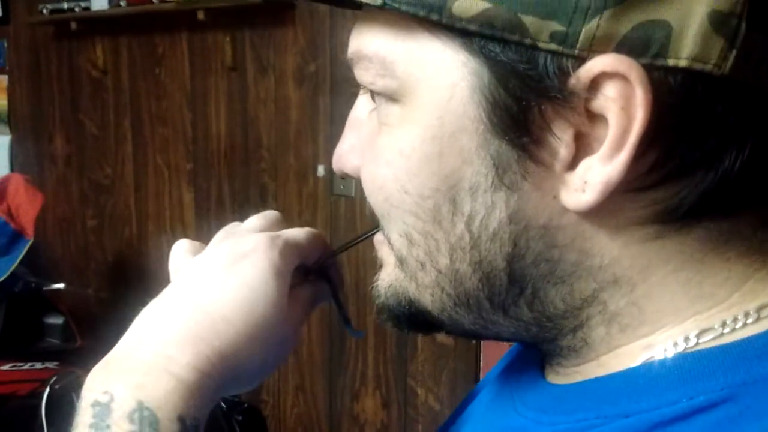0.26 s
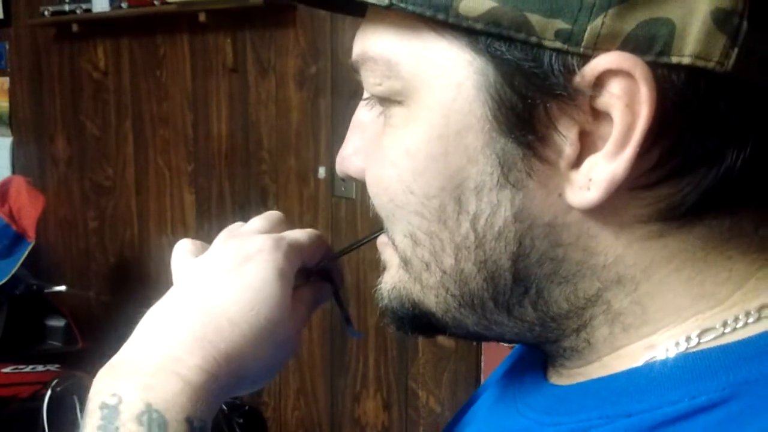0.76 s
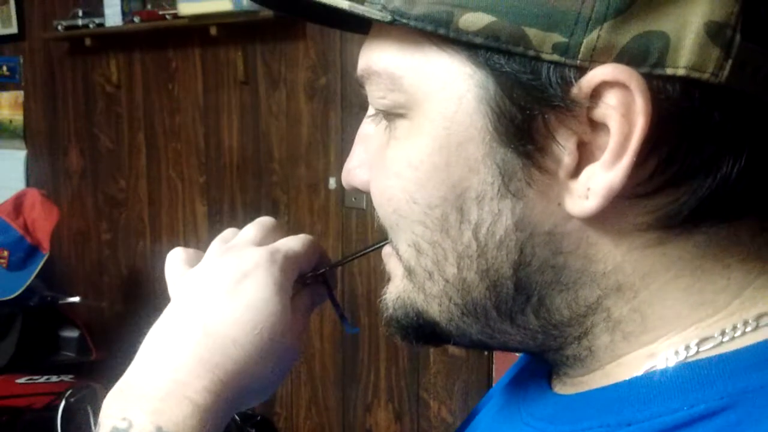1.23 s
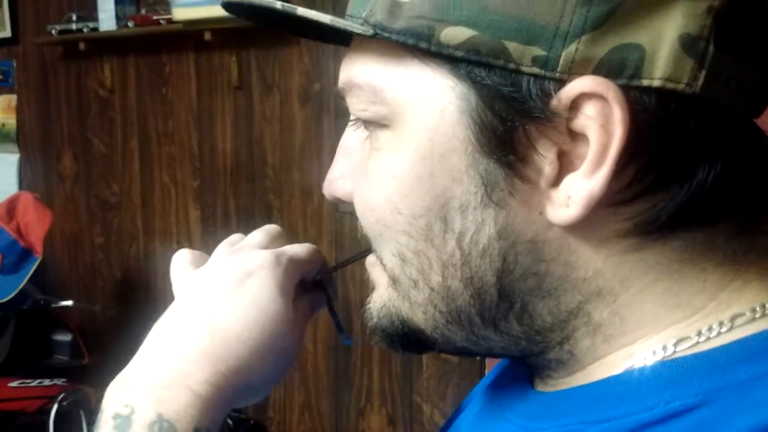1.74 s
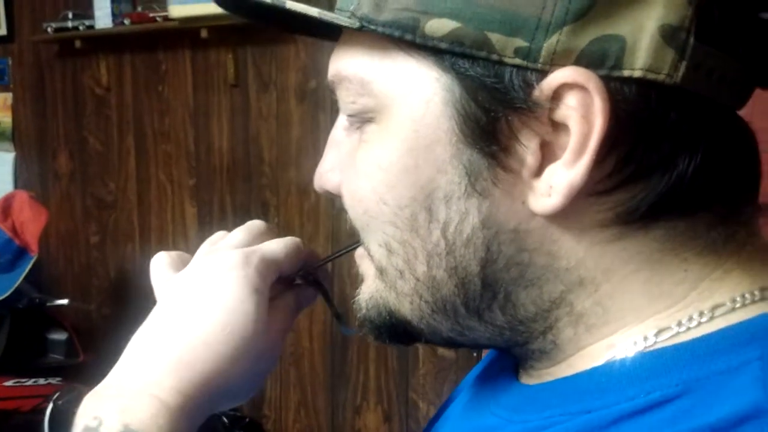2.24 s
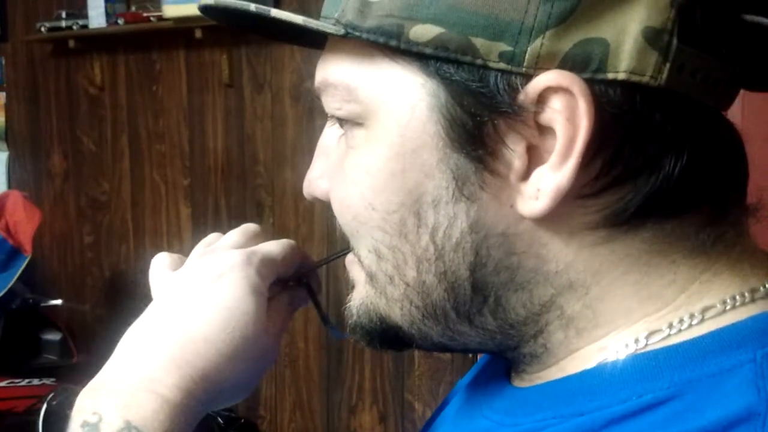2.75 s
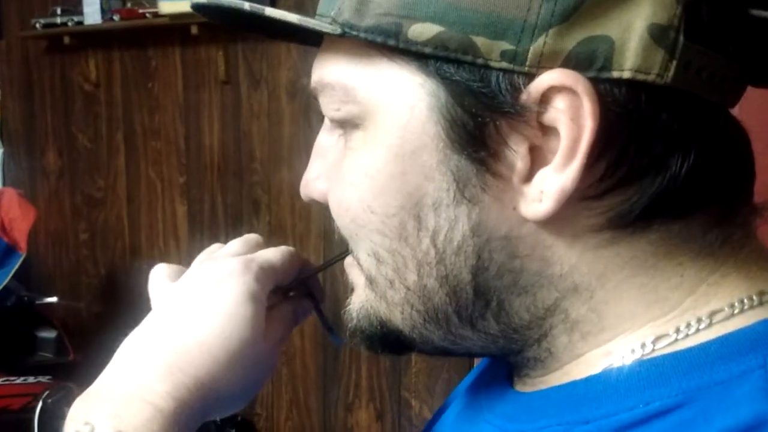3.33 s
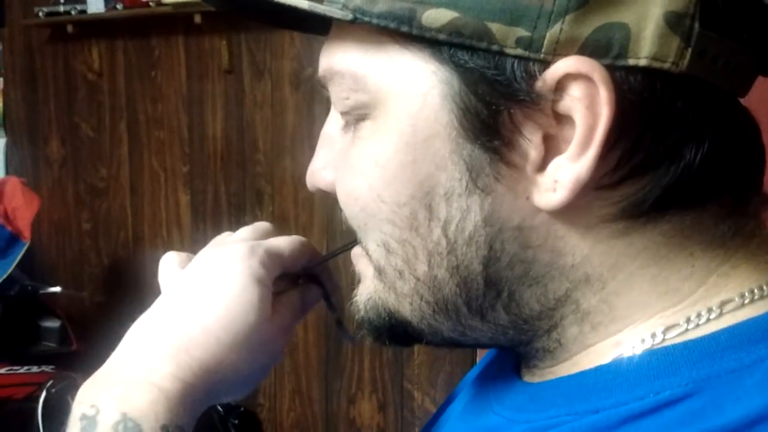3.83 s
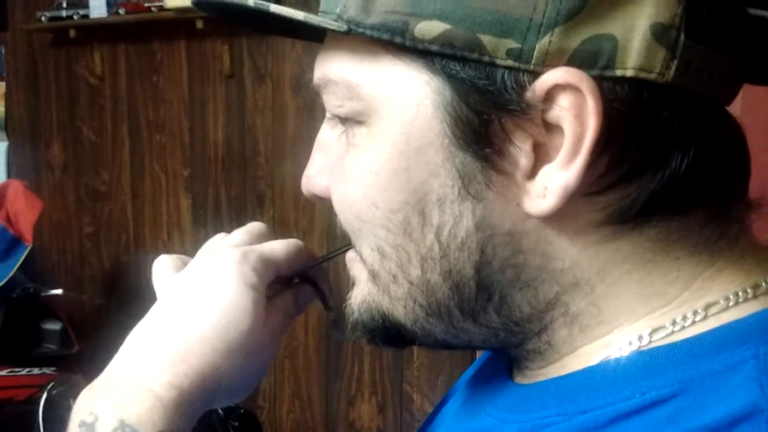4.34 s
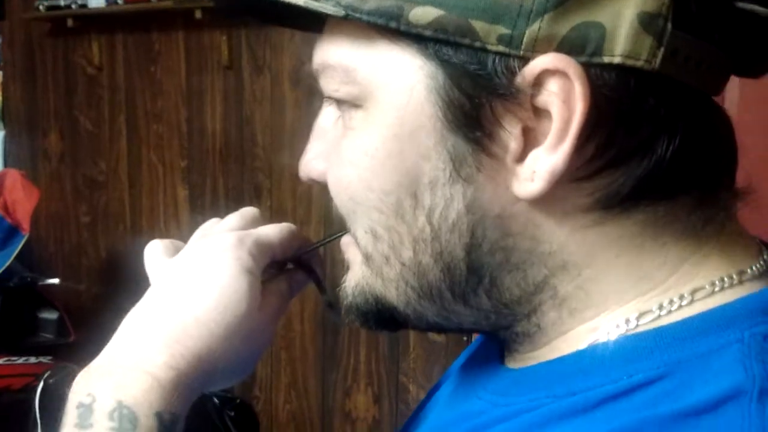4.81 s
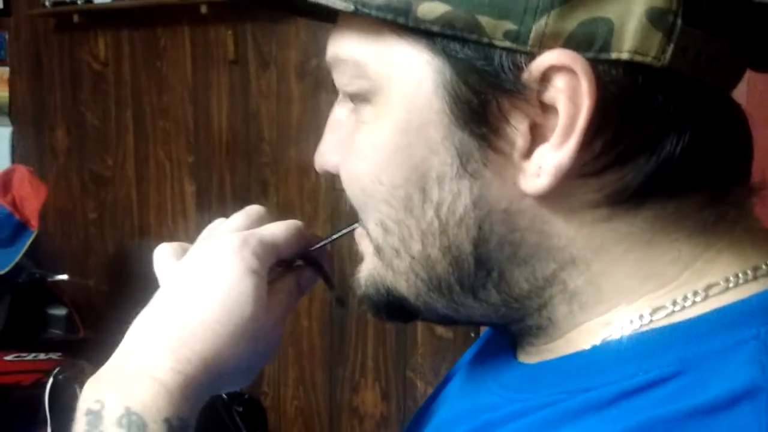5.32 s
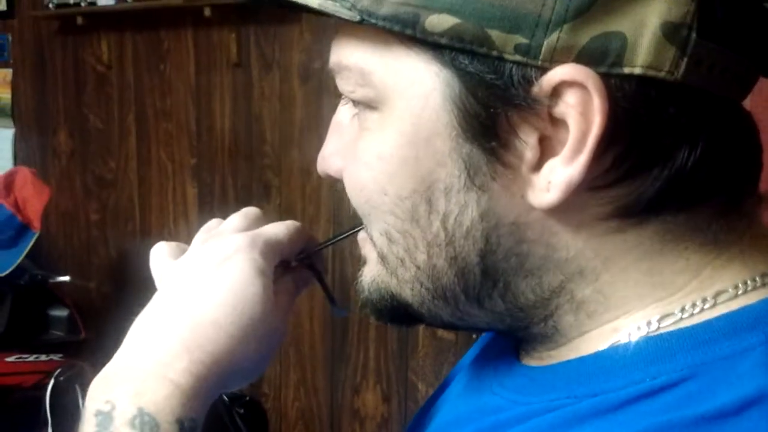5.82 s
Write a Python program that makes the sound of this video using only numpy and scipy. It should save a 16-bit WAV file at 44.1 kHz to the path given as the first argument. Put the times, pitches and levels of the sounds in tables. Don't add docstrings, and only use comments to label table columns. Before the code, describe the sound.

Tiny sharp steel ticks inside a lock held close, irregularly spaced, with brief handling bumps in a quiet small room with low hiss.

```python
import sys
import numpy as np
from scipy import signal
from scipy.fft import rfft, irfft, next_fast_len
from scipy.io import wavfile
from scipy.ndimage import uniform_filter1d

SR = 44100
rng = np.random.default_rng(int(sys.argv[2]) if len(sys.argv) > 2 else 0)


def voltage_ratio(decibels):
    exponent = np.asarray(decibels, float) / 20
    return 10 ** exponent


def to_wav(s):
    ch = np.atleast_2d(s).T
    pcm = np.round(np.clip(ch, -1, 1) * 32767)
    wavfile.write(sys.argv[1], SR, pcm.astype(np.int16))


N = 267731

# (frequency [Hz], level [dB])
AIR_SPECTRUM = [(20, -77), (90, -61), (140, -66.5), (330, -70), (460, -70.5), (1000, -75.5), (2800, -88.5),
                (3800, -89)]
AIR_FALL_DB = -24
# (centre [Hz], width [Hz], gain [dB])
AIR_LUMPS = [(96, 20, 3.5), (120, 7, 3), (143, 20, -2), (394, 20, 8), (459.5, 29, 5), (510, 38, 5.5),
             (585, 73, -2.5), (700, 47, 4), (744, 25, -5), (803, 40, 4.5), (895, 24, 4.5), (950, 40, -2),
             (1028, 63, 6), (1200, 105, 2)]
# (frequency [Hz], level [dB])
PORT_HISS = [(100, -89), (3000, -97.5), (6200, -101), (8000, -95.5), (9500, -95.5), (12000, -99),
             (15500, -100), (15640, -150)]
# (frequency [Hz], gain [dB])
HISS_TILT = [(1000, 0), (7500, 0), (9300, -5), (11500, -5), (13000, 0), (15000, -2)]
# (frequency [Hz], t60 [s])
ROOM_T60 = [(500, 0.25), (2000, 0.58), (5000, 0.22), (8000, 0.24), (13000, 0.21), (14500, 0.072),
            (15500, .03)]
# (frequency [Hz], gain [dB])
WALL_GAIN = [(6000, 1), (9000, -1), (12000, -4)]

# (centre [Hz], width [Hz], level [dB])
SCRATCH_MODES = [(7000, 1200, 0), (8400, 1500, -1)]
SCRATCH_PER_S, SCRATCH_DB = 45, -65
# (time [s], level [dB], centre [Hz], width [Hz], length [ms])
RUBS = [
    (2.44, -57, 1860, 220, 210),
    (3.283, -32, 4700, 3000, 13),
    (3.283, -48, 8400, 1500, 13),
    (3.5, -51.5, 1850, 300, 210),
    (5.415, -44, 3930, 2400, 42),
]
# (time [s], level [dB], centre [Hz], width [Hz], length [ms])
KNOCKS = [(.008, -49, 7000, 1500, 2.5), (.018, -42, 8000, 3000, 5), (.2562, -38, 11000, 8000, .4),
          (.2578, -34, 1490, 1800, 2), (.8805, -32, 1900, 1300, 2.8), (.884, -32, 1180, 240, 8.7),
          (3.153, -37, 5000, 9100, 1.7), (3.284, -30.5, 2050, 2400, 24), (3.286, -32, 895, 600, 34),
          (5.339, -28.5, 804, 700, 4), (5.34, -43, 3000, 2500, 2.7)]
KNOCK_FAR_DB, RUB_FAR_DB = -8.5, 5.5

# (time [s], peak [dB], lock case share [dB], pin share [dB], moving pin pitch [Hz])
CLICKS = [(0.2569, -26.5, -18, -4, 10400), (0.8805, -19.5, -14, -4.5, 13000), (2.051, -43, -5, -7, 12700),
          (2.483, -39, -6, -13, 13200), (3.173, -22.5, -12, -8, 13000), (3.5094, -50.5, -16, -4, 13000),
          (3.7134, -37.5, -4.5, -4, 12900), (4.2728, -37, -5, -7, 15700), (4.633, -38, -19, -13, 14500),
          (4.8497, -46, -16, -8, 12400), (5.445, -39.5, -4.5, -8, 12900), (6.05, -42, -18, -11, 10800)]
RATTLE_MS, RATTLE_MS_PER_DB = 1.95, .018
# (centre [Hz], width [Hz], level [dB])
CASE_MODES = [(3450, 450, -1), (3850, 500, 0), (4530, 500, -7), (5000, 600, -4), (5550, 600, -3)]
# (centre [Hz], width [Hz], level [dB])
BLADE_MODES = [(6700, 660, -1), (7270, 490, 1.5), (8730, 530, 6), (9130, 310, -12)]
# (centre [Hz], width [Hz], level [dB])
PIN_MODES = [(11100, 950, 9), (11600, 550, -8), (13000, 750, 1), (15000, 540, -24), (15100, 600, -24)]
# (time [s], level [dB], centre [Hz], width [Hz], length [ms])
JOLTS = [
    (.8808, -21.5, 4570, 1140, 0.98),
    (.8811, -21, 5450, 1200, 0.82),
    (.8815, -24, 3500, 600, 1.07),
    (3.1733, -28.5, 3980, 900, 2.4),
    (4.2731, -41, 5050, 1500, .3),
]
# (time [s], level [dB], frequency [Hz], rise [ms])
RINGS = [(.2572, -32, 10500, .35), (.2576, -37, 10000, .5), (.2574, -41, 9000, .5),
         (.8806, -25, 3460, 0.81), (.881, -25, 4500, 0.39), (.8811, -23, 5340, .35), (.8808, -25, 6340, .5),
         (.8807, -25.5, 8150, 0.35), (.881, -28.5, 11080, 0.98), (.8819, -26, 11780, .8),
         (.8811, -22.5, 13000, .6), (.8816, -29, 14450, .7), (.8812, -30, 15000, .6),
         (.8832, -28, 5900, .3), (.8831, -30, 10000, .3), (0.81, -35, 3800, .8), (.8808, -40, 1400, 0.48),
         (2.4835, -42, 4050, 0.89), (2.4835, -48, 13400, .7), (2.484, -52, 14700, .6),
         (3.174, -21.5, 13000, 0.57), (3.1734, -30, 5600, .4), (3.1745, -31, 6200, .4),
         (3.1733, -27, 7450, 0.41), (3.174, -34, 8600, .6), (3.1736, -30, 10900, .4),
         (3.1745, -33, 11600, 0.52), (3.1797, -40, 10900, 2.2), (4.273, -35, 4900, 0.38),
         (4.2728, -41, 8160, 0.31), (4.2735, -40.5, 3750, 0.7), (4.273, -38, 12900, .4),
         (4.2725, -36, 15700, .6)]

PORTS_APART_M = .116
# (frequency [Hz], gain [dB])
CROSS_GAIN = [(1600, -2.9), (3200, -7), (6400, -4.6), (8000, -7.5), (9500, -13), (11500, -15), (12700, -13),
              (13900, -7.3)]
CROSS_DELAY_MS, PORT_HZ, PORT_DELAY_MS = .311, 8050, .117
# (frequency [Hz], share [ratio])
LOCK_SIDE = [(3400, 1.1), (4600, 1.0), (5500, 0), (6700, .5), (8000, 1.1), (12300, 1.2), (13300, -.6),
             (14300, -.95)]
# (frequency [Hz], gain [dB])
RIGHT_GAIN = [(400, -2.3), (1000, -5.2), (1250, -1.8), (4000, -2.2), (6500, -.3), (9500, 1.6), (11500, .3),
              (13000, -2.5)]
# (frequency [Hz], gain [dB])
TOP_EDGE = [(15400, 0), (15900, -4), (16500, -20), (16850, -55)]


def read(points, hz):
    f, value = np.transpose(points)
    return np.interp(np.log(hz + 1), np.log(f + 1), value)


def ring(x, modes):
    t = np.arange(len(x)) / SR
    response = 0
    for hz, width, db in modes:
        response = response + voltage_ratio(db) * np.exp(-np.pi * width * t) * np.sin(2 * np.pi * hz * t)
    out = signal.fftconvolve(x, response)[:len(x)]
    return out / abs(out).max()


def add(ports, s, sound, far_db):
    for port, lag, db in ((0, 0, 0), (1, 9, far_db)):
        part = ports[port, round(s * SR) + lag:][:len(sound)]
        part += voltage_ratio(db) * sound[:len(part)]


def bumps(table, far_db):
    ports, t = np.zeros((2, N)), np.arange(12000) / SR
    draws = rng.standard_normal((len(table), 12000))
    for (s, db, hz, width, length_ms), z in zip(table, draws):
        u = 1000 * t / length_ms
        puff = z * abs(z) * np.minimum(u / 0.35, 1) * np.exp(-u)
        mode = [(hz, width, 0)]
        add(ports, s, voltage_ratio(db) * ring(ring(puff, mode), mode), far_db)
    return ports


def background():
    frames, hz = N // 512 + 5, np.fft.rfftfreq(2048, 1 / SR)[:, None]
    z = rng.standard_normal((frames, 1025, 8)).T
    first, second, near, far = z[:4] + 1j * z[4:]
    same = np.sinc(2 * hz * PORTS_APART_M / 343)
    field = np.array([first, same * first + np.sqrt(1 - same ** 2) * second])
    lumps_db = sum(db / (1 + (2 * (hz - f) / width) ** 2) for f, width, db in AIR_LUMPS)
    fall_db = AIR_FALL_DB * np.log2(np.maximum(hz / AIR_SPECTRUM[-1][0], 1))
    air = voltage_ratio(read(AIR_SPECTRUM, hz) + lumps_db + fall_db) * (hz < 15550) * field
    hiss = voltage_ratio(read(PORT_HISS, hz)) * np.array([near, far * voltage_ratio(read(HISS_TILT, hz))])
    return voltage_ratio(12.0) * signal.istft(air + hiss, nperseg=2048, noverlap=1536)[1][:, :N]


def room(x):
    taps = np.zeros((2, 20000))
    at = np.arange(205, 19980, 20)
    at = at + rng.integers(0, 20, (2, len(at)))
    np.put_along_axis(taps, at, rng.choice([-1., 1.], at.shape), 1)
    hz, t, z = signal.stft(taps, SR, nperseg=128)
    decay_db = read(WALL_GAIN, hz)[:, None] - 60 * t / read(ROOM_T60, hz)[:, None]
    tail = signal.istft(z * voltage_ratio(decay_db), SR, nperseg=128)[1]
    tail = tail / np.linalg.norm(tail[0]) * voltage_ratio(-0.5)
    return signal.fftconvolve(x[None], tail, axes=1)[:, :N]


def scratches():
    starts = rng.exponential(1, N)
    size = voltage_ratio(4 * np.minimum(starts, 3)) * (rng.random(N) < SCRATCH_PER_S / SR)
    rub = signal.oaconvolve(size, np.hanning(300))[:N] * rng.standard_normal(N)
    tone = ring(ring(signal.unit_impulse(200), SCRATCH_MODES), SCRATCH_MODES)
    scratch = voltage_ratio(SCRATCH_DB) * signal.oaconvolve(rub, tone / np.linalg.norm(tone))[:N]
    return scratch * voltage_ratio(np.array([[-7], [0]]))


def knocks():
    return bumps(KNOCKS, KNOCK_FAR_DB) + bumps(RUBS, RUB_FAR_DB)


def cross_feed(hz):
    above = 400 * (np.logaddexp(0, (hz - PORT_HZ) / 400) - np.logaddexp(0, (hz - PORT_HZ - 6000) / 400))
    turns = (hz * CROSS_DELAY_MS + above * PORT_DELAY_MS) / 1000
    return voltage_ratio(read(CROSS_GAIN, hz)) * np.exp(-2j * np.pi * turns)


def rings():
    ports, t = np.zeros((2, N)), np.arange(900) / SR
    for s, db, hz, rise_ms in RINGS:
        u = 1000 * t / rise_ms
        add(ports, s, voltage_ratio(db) * u * np.exp(1 - u) * np.sin(2 * np.pi * hz * t), -16)
    return ports


def lock():
    ports = bumps(JOLTS, -16.5) + rings()
    t, hz = np.arange(900) / SR, np.fft.rfftfreq(900, 1 / SR)
    small = 1 / (1 + (3200 / (hz + 1)) ** 6)
    draws = rng.standard_normal((len(CLICKS), 900))
    for (s, db, case_db, pins_db, pin_hz), z in zip(CLICKS, draws):
        u = 1000 * t / np.maximum(RATTLE_MS + RATTLE_MS_PER_DB * db, .2)
        swell = (u + 0.03) ** 0.64 * np.exp(-u ** 1.57)
        impacts = rfft(z * abs(z) * swell)
        even = uniform_filter1d(abs(impacts), size=9) ** .8
        impacts = irfft(impacts * small / even) * (u < 2.6)
        case = voltage_ratio(case_db) * ring(impacts, CASE_MODES)
        blade = voltage_ratio(-9) * ring(impacts, BLADE_MODES)
        pins = voltage_ratio(pins_db) * ring(impacts, PIN_MODES + [(pin_hz, 800, 6)])
        add(ports, s, voltage_ratio(db + 9.5) * (case + blade + pins), -15)
    hz = np.fft.rfftfreq(N, 1 / SR)
    side = irfft(rfft(ports[0]) * read(LOCK_SIDE, hz) * cross_feed(hz), N)
    ports[1] += side * (ports[0] != 0)
    return ports


def scene():
    close = lock() + knocks()
    return close + voltage_ratio(-13.0) * room(close[0]) + scratches() + background()


def band_limit(x):
    return signal.sosfilt(signal.butter(12, 16780, fs=SR, output="sos"), x)


def record(dry):
    size = next_fast_len(N + 999)
    hz = np.fft.rfftfreq(size, 1 / SR)
    near, far = rfft(dry, size) * voltage_ratio(read(TOP_EDGE, hz))
    cross = cross_feed(hz)
    left = near + cross * far
    right = -voltage_ratio(read(RIGHT_GAIN, hz)) * (far + cross * near)
    mixed = irfft([left, right], size)[:, :N]
    treble = signal.lfilter(*signal.butter(2, 1200, "high", fs=SR), mixed)
    power = uniform_filter1d((treble ** 2).mean(0), size=200, origin=99)
    power_db = 10 * np.log10(abs(power) + 1e-12)
    fall = np.arange(N) * 8.0 / SR
    held_db = np.maximum.accumulate(power_db + fall) - fall
    over_db = np.maximum(held_db + 29.0, 0)
    pull = np.exp(-1 / (0.014 * SR))
    duck_db = 1.3 * signal.lfilter([1 - pull], [1, -pull], over_db)
    return band_limit(mixed / voltage_ratio(duck_db))


dry = scene()
out = record(dry)
to_wav(out)
```